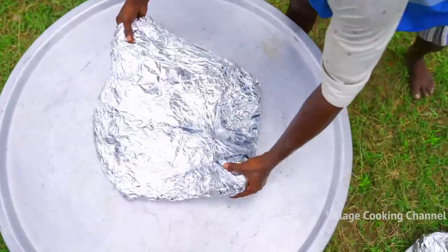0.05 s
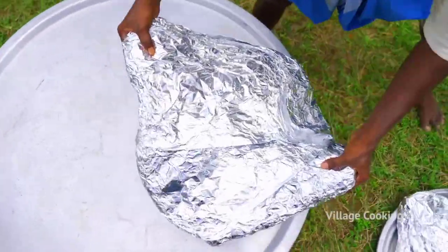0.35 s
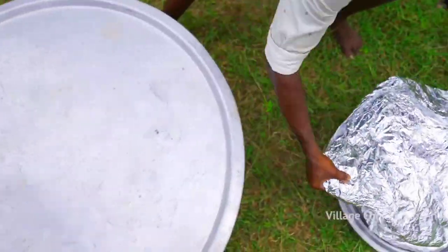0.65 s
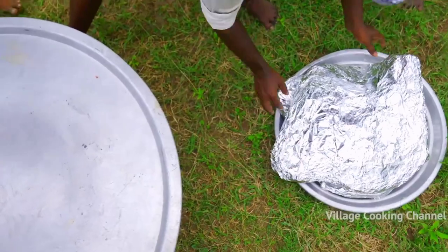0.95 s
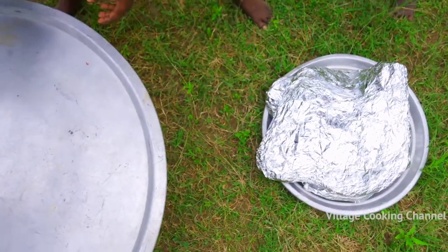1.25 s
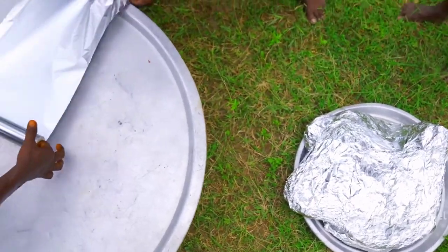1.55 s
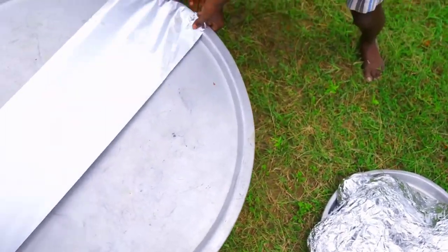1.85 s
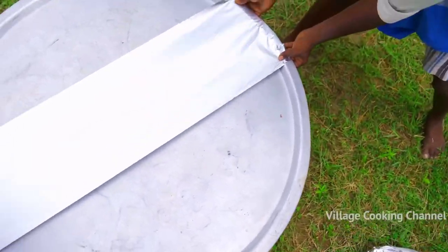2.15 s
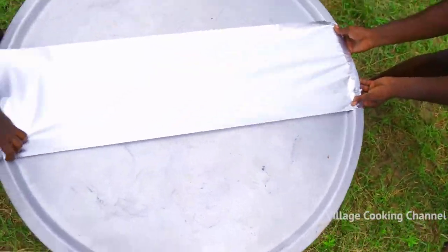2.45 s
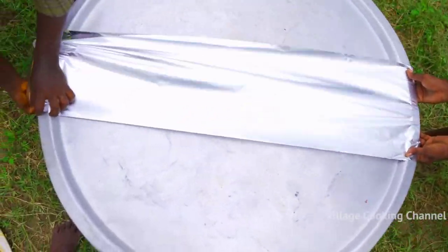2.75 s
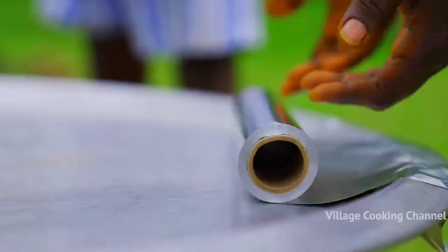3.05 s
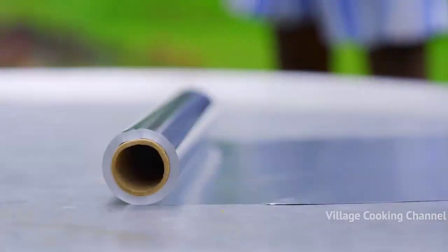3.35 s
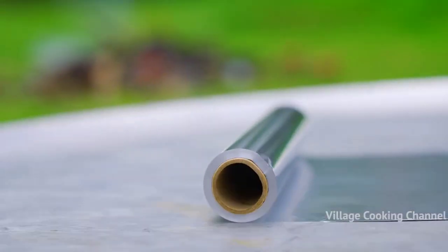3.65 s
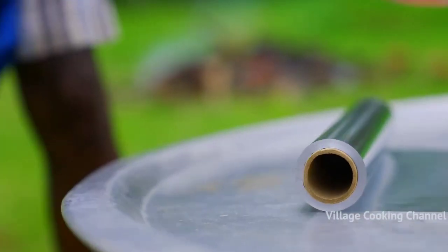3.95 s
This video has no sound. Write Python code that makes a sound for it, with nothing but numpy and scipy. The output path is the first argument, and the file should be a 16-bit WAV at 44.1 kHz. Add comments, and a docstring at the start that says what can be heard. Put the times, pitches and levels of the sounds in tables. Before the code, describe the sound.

Crinkling aluminium foil being handled and unrolled, ending with a rolling rumble on a metal tray.

```python
"""A sheet of aluminium foil is pulled crinkling off its roll, each crease buckling with a tiny click.
Before that, a foil-wrapped bundle is lifted off a big metal tray and set down on a smaller one,
while birds twitter in the open air. The fresh sheet is pressed onto the big tray; then the roll
trundles across it, close by, and its small impacts drive the tray's modes into a rumble."""
import sys
import numpy as np
from scipy import signal
from scipy.io import wavfile
from scipy.ndimage import uniform_filter1d

SR = 44100
rng = np.random.default_rng(int(sys.argv[2]) if len(sys.argv) > 2 else 0)


def store_wav(level_fs):
    """Save 16-bit WAV to argv[1]."""
    pcm = np.round(np.clip(np.atleast_2d(level_fs), -1, 1) * 32767)
    wavfile.write(sys.argv[1], SR, pcm.T.astype(np.int16))


N = 176400
T = np.arange(N) / SR


def amp(db):
    """Amplitude ratio of a level in decibels."""
    return 10 ** (np.asarray(db) / 20)


def unit(x):
    """Normalisation to rms 1."""
    return x / np.sqrt(np.mean(x ** 2) + 1e-20)


def bandpass(x, low_hz, high_hz, order=2):
    """Butterworth filtering to one band."""
    return signal.sosfilt(signal.butter(order, [low_hz, high_hz], "band", fs=SR, output="sos"), x)


def curves(rows):
    """Linear interpolation of each level column in time, with a fast fade outside the table."""
    times, *columns = np.transpose(rows)
    fade_db = 3000 * np.abs(T - np.clip(T, times[0], times[-1]))
    return [np.maximum(np.interp(T, times, db) - fade_db, -120) for db in columns]


def swells(rows):
    """A sum of Gaussian envelopes, one for each row."""
    return sum(amp(db) * np.exp(-((T - s) / sigma_s) ** 2 / 2) for s, db, sigma_s in rows)


def even(x, window_s):
    """Division by the running rms steadies the level and keeps the finer grain."""
    power = np.abs(uniform_filter1d(x * x, max(int(window_s * SR), 8)))
    return x / np.sqrt(power + 0.0012 * np.mean(x * x))


def clicks(per_s, spread_db, ring_s):
    """Envelope of a Poisson process: many small ticks and a few large, each decaying exponentially."""
    sizes = (rng.random(N) < per_s / SR) * amp(spread_db * np.minimum(rng.exponential(1, N), 5))
    energy = signal.lfilter([1], [1, -np.exp(-2 / (ring_s * SR))], sizes ** 2 + 1e-18)
    return np.sqrt(energy)


def colour(drive, spectrum):
    """Spectral shaping: an envelope modulates independent noise in half-octave bands; rms 1."""
    hz, db = np.transpose(spectrum)
    edges, out = np.geomspace(24, 17000, 20), 0
    for low, high in zip(edges, edges[1:]):
        if high > hz[0] and low < hz[-1]:
            band = bandpass(drive * rng.standard_normal(N) + 1e-18, low, high)
            out = out + band * amp(np.interp(np.log(low * high) / 2, np.log(hz), db))
    return unit(out)


def resonate(drive, modes, q):
    """Modal superposition: noise bursts drive damped resonators, the high ones dying sooner; rms 1."""
    out = 0
    for hz, db in modes:
        width_hz = 6 + hz / q
        r = np.exp(-np.pi * width_hz / SR)
        feedback = [1, -2 * r * np.cos(2 * np.pi * hz / SR), r * r]
        force = drive * rng.standard_normal(N) + 1e-18
        out = out + amp(db) * (1 - r * r) * signal.lfilter([1, 0, -1], feedback, force)
    return unit(bandpass(out, modes[0][0] / np.sqrt(2), modes[-1][0] * np.sqrt(2)))


def shimmer(x, t60_s=0.046):
    """Convolution with a short, uneven tail: dense reflections and close modes of the nearby metal."""
    age = T[:SR // 25]
    tail = rng.standard_normal(len(age)) * amp(-60 * age / t60_s)
    return x + amp(-13) * signal.fftconvolve(x, tail / np.linalg.norm(tail))[:N]


# spectrum of the outdoor background: f/Hz, density level/dB
AIR_SPECTRUM = [(30, -17), (80, 1), (250, 0), (2000, -25), (15000, -30)]
def air():
    """Stationary noise of the open air, strongest at low frequencies."""
    return amp(-46.5) * colour(1, AIR_SPECTRUM)


def chirps(notes, sigma_s=0.0025, fall_hz_per_s=65000):
    """Linear frequency sweeps: each note is a falling sine under a Gaussian envelope."""
    out = np.zeros(N)
    for s, hz in notes:
        near = np.abs(T - s) < 10 * sigma_s
        t = T[near] - s
        phase = 2 * np.pi * (hz - fall_hz_per_s * t / 2) * t
        out[near] += np.exp(-(t / sigma_s) ** 2 / 2) * np.sin(phase)
    return out


# notes of the near bird: t/s, f/Hz
BIRD_NOTES = [(.335, 6140), (0.403, 5840), (.605, 6600), (.629, 6600), (0.643, 5000), (.676, 4900),
              (.707, 4950)]
# twitter of far birds: t/s, level/dB
TWITTER_LEVEL = [(.1, -52), (.33, -45.5), (.46, -50), (1.05, -44.5)]
def birds(far_per_s=700, centre_hz=5940, width_hz=1350):
    """Single chirps stand out from a distant twitter, the incoherent sum of many more."""
    draws = rng.random((far_per_s * N // SR, 2))
    far_notes = [(when * N / SR, centre_hz + width_hz * (pitch - 0.5)) for when, pitch in draws]
    twitter = amp(curves(TWITTER_LEVEL)[0]) * unit(shimmer(chirps(far_notes)))
    return shimmer(amp(-37) * chirps(BIRD_NOTES) + twitter)


# decay of the tray's rim: t/s, level/dB
RIM_DECAY = [(2.76, -28), (3.06, -39.5)]
# modes of the rim: f/Hz, relative level/dB
RIM_PARTIALS = [(96.9, 0), (262, 3), (315, -0.5), (932, -7.5), (1195, -12)]
def rim():
    """Free vibration: after the roll is pressed down, the rim rings on, fading, then stops abruptly."""
    age = np.maximum(T - RIM_DECAY[0][0], 0)
    ring = sum(amp(db) * np.sin(2 * np.pi * (hz * age + rng.random())) for hz, db in RIM_PARTIALS)
    return amp(curves(RIM_DECAY)[0]) * unit(ring)


# knocks on the tray and flaps of the sheet: t/s, f/Hz, level/dB, T60/s
KNOCKS = [(0, 299, -22.5, 0.21), (0.821, 319, -29.5, 0.13), (1.659, 189, -20, 0.071),
          (2.079, 195, -13, 0.031), (2.479, 230, -15, 0.05), (2.622, 76.7, -18.5, 0.46),
          (2.622, 947, -20.5, 0.26), (2.741, 300, -4, 0.03)]
def thumps(rise_s=0.0013):
    """Each knock or flap is the impulse response of one damped oscillator."""
    out = 0
    for s, hz, db, t60 in KNOCKS:
        age = np.maximum(T - s, 0)
        envelope = amp(db - 60 * age / t60) * (1 - np.exp(-age / rise_s))
        out = out + envelope * np.sin(2 * np.pi * hz * age)
    return out


# low and high modes of the big tray's floor: f/Hz, relative level/dB
LOW_MODES = [(92, 4.5), (112, 6), (130, -3.5), (203, 1), (243, -0.5), (266, -2.5), (308, -1), (342, -4.5),
             (478, -11.5)]
HIGH_MODES = [(835, 8.5), (932, 6.5), (1088, 8), (1195, 6), (1285, 5.5), (1525, 2.5), (1680, 3.5),
              (1850, 4.5)]
def tray(db, modes, spectrum, per_s, ring_db, window_s):
    """Impact excitation of a plate: small bumps give a dead contact sound and ring its modes."""
    bumps = clicks(per_s, spread_db=1.94, ring_s=0.0041)
    contact = colour(bumps, spectrum)
    ring = amp(ring_db) * resonate(bumps, modes, q=50)
    return amp(db) * even(contact + ring, window_s)


def foil(levels, spectrum, spread_db):
    """Buckling of tiny creases: harder handling makes the clicks denser, louder and wider in band."""
    db, = curves(levels)
    effort_db = np.maximum(db - db.max(), -30)
    per_s = 200 + 2400 * amp(0.6 * effort_db)
    creases = clicks(per_s, spread_db, ring_s=0.0093)
    crinkle = even(shimmer(colour(creases, spectrum)), window_s=0.05)
    hiss = bandpass(crinkle, 1650, 9600, order=1)  # the band that remains in gentle handling
    return amp(db) * (hiss + amp(0.78 * effort_db) * (crinkle - hiss))


# the bundle's crumpling and its rubbing on the trays: t/s, level/dB
CRUMPLE_LEVEL = [(0, -44), (.045, -33.5), (.145, -28.5), (.228, -28), (.26, -45.5), (.44, -52.5), (.5, -40),
                 (.64, -48), (.76, -35.5), (.81, -26.5), (.816, -20.5), (.868, -22.5), (.92, -29.5),
                 (.997, -34), (1.003, -25), (1.025, -41.5), (1.06, -46)]
RUB_LEVEL = [(0, -38.5), (.1, -46), (.122, -23.5), (.175, -34.5), (.27, -43.5), (.8, -65), (.825, -20),
             (.92, -63)]
# their spectra: f/Hz, density level/dB
CRUMPLE_SPECTRUM = [(450, -2), (1000, 1.5), (2000, -1.5), (15000, -1.5)]
RUB_SPECTRUM = [(150, -1), (290, 9.5), (550, 3.5), (1000, 0.5), (3000, -32)]
def bundle():
    """The bundle's wrapping buckles, and its friction on the metal excites the upper modes."""
    rub_db, = curves(RUB_LEVEL)
    crumple = foil(CRUMPLE_LEVEL, CRUMPLE_SPECTRUM, spread_db=4.0)
    rub = tray(rub_db, LOW_MODES[5:] + HIGH_MODES, RUB_SPECTRUM, per_s=400, ring_db=-14.5, window_s=0.017)
    return crumple + rub


# the roll dragged on the tray: t/s, rumble level/dB, scrape level/dB
DRAG_LEVELS = [(2.375, -42, -53), (2.394, -24.5, -34), (2.44, -34.5, -48), (2.55, -33.5, -31.5),
               (2.614, -37, -43), (2.623, -25.5, -17.5), (2.685, -25.5, -23.5), (2.72, -33.5, -45),
               (2.81, -15, -24.5), (2.93, -30, -31), (3.06, -41, -39.5)]
# contact spectra of roll on tray: f/Hz, density level/dB
RUMBLE_SPECTRUM = [(35, -36), (85, -9.5), (320, -5), (700, -18.5)]
SCRAPE_SPECTRUM = [(300, -19), (500, 3.5), (1400, -16), (2500, -5.5), (8000, -14)]
def dragging():
    """Sliding friction drives the tray as the roll is dragged and pressed onto it."""
    rumble_db, scrape_db = curves(DRAG_LEVELS)
    rumble = tray(rumble_db, LOW_MODES, RUMBLE_SPECTRUM, per_s=350, ring_db=3, window_s=0.088)
    scrape = tray(scrape_db, HIGH_MODES, SCRAPE_SPECTRUM, per_s=1600, ring_db=-5, window_s=0.025)
    return rumble + scrape


# the roll running free: t/s, rumble level/dB, rattle level/dB
ROLL_LEVELS = [(3.095, -61.5, -75), (3.12, -25, -48), (3.235, -16.5, -22.5), (3.35, -14, -24),
               (3.41, -15.5, -18), (3.46, -16.5, -26.5), (3.535, -12.5, -22), (3.72, -21.5, -35.5),
               (3.89, -20, -33), (4, -28.5, -44)]
# swishes of foil peeling off the turning roll: t/s, level/dB, Gaussian sigma/s
SWISHES = [(3.24, -22, 0.021), (3.305, -27, 0.021), (3.405, -24.5, 0.031), (3.522, -25, 0.03),
           (3.692, -33, 0.02), (3.81, -32, 0.02), (3.887, -34.5, .016)]
# spectra of rattle and swish: f/Hz, density level/dB
RATTLE_SPECTRUM = [(350, -4), (550, 6), (1700, -9), (2500, -6.5), (9000, -24.5)]
SWISH_SPECTRUM = [(1500, 0.5), (5000, 0), (7800, -5.5), (8800, -12), (15000, -19)]
def rolling(sizzle_hz=7130):
    """Rolling contact drums on the tray while foil peels off in swishes with a sizzling resonance."""
    rumble_db, rattle_db = curves(ROLL_LEVELS)
    ticks = clicks(per_s=1500, spread_db=3.2, ring_s=0.003)
    peel = even(shimmer(colour(ticks, SWISH_SPECTRUM)), window_s=0.041)
    sizzle = amp(-8.5) * resonate(ticks, [(sizzle_hz, 0)], q=27)
    rumble = tray(rumble_db, LOW_MODES, RUMBLE_SPECTRUM, per_s=280, ring_db=6.5, window_s=0.1)
    rattle = tray(rattle_db, HIGH_MODES, RATTLE_SPECTRUM, per_s=520, ring_db=1.5, window_s=0.023)
    return rumble + rattle + swells(SWISHES) * (peel + sizzle)


# single large creases: t/s, onset level/dB
CREASE_SNAPS = [(0.216, -22), (.319, -38), (.525, -29.5), (.585, -33), (0.77, -28), (1.002, -22),
                (1.069, -15), (1.649, -18), (1.894, -20), (2.94, -19)]
# their spectrum: f/Hz, density level/dB
SNAP_SPECTRUM = [(1500, -16), (8000, 3), (15000, 2)]
def snaps(t60_s=0.026):
    """Snap-through buckling: a large crease gives way with a bright, exponentially dying tick."""
    envelope = sum(amp(db - 60 * np.maximum(T - s, 0) / t60_s) * (T >= s) for s, db in CREASE_SNAPS)
    return envelope * colour(1, SNAP_SPECTRUM)


def glide(x, centre_hz, block=128):
    """A broad resonance that follows a moving centre frequency."""
    out, state = np.zeros(N), np.zeros(2)
    for i in range(0, N, block):
        b, a = signal.iirpeak(centre_hz[i], Q=2, fs=SR)
        out[i:i + block], state = signal.lfilter(b, a, x[i:i + block], zi=state)
    return out


# crinkling of the tugged sheet: t/s, relative level/dB
TUG_LEVEL = [(1.06, -35), (1.072, -18.5), (1.15, -21.5), (1.172, -15), (1.204, -24), (1.244, -17),
             (1.256, -25), (1.292, -24.5), (1.31, -15), (1.36, -22.5), (1.422, -17), (1.44, -26.5),
             (1.494, -20.5), (1.58, -26.5), (1.612, -21.5), (1.643, -26), (1.651, -16.5), (1.73, -24.5),
             (1.835, -22), (1.89, -21.5), (1.972, -29), (1.992, -21.5), (2.054, -28), (2.088, -20),
             (2.145, -19), (2.19, -23.5), (2.32, -29.5), (2.375, -26), (2.398, -19.5), (2.5, -22),
             (2.552, -17.5), (2.602, -24), (2.65, -19), (2.72, -15), (2.755, -19.5), (2.82, -19.5),
             (3.078, -46), (3.09, -31.5), (3.15, -44)]
# its spectrum: f/Hz, density level/dB
SHEET_SPECTRUM = [(200, -8.5), (1500, -7.5), (6500, -2.5), (15000, 0.5)]
# resonance of the lengthening sheet: t/s, f/Hz
SHEET_RESONANCE = [(1.6, 5200), (2.05, 3180)]
# crackles of the flexing sheet: t/s, level/dB, Gaussian sigma/s
FLEX_SWELLS = [(1.135, -30.5, 0.037), (1.315, -40, 0.017), (1.422, -29.5, 0.0054), (1.69, -37.5, 0.053),
               (1.83, -35, 0.08)]
def sheet():
    """Buckling creases hiss through a resonance that sinks as the sheet grows; flexing rings its modes."""
    hiss = foil(TUG_LEVEL, SHEET_SPECTRUM, spread_db=3.8)
    resonance = glide(hiss, np.interp(T, *np.transpose(SHEET_RESONANCE)))
    modes = [(hz, 0) for hz in np.geomspace(500, 2830, 24)]
    pops = clicks(per_s=120, spread_db=3, ring_s=0.001)
    crackles = swells(FLEX_SWELLS) * even(resonate(pops, modes, q=17), window_s=0.017)
    return 1.098 * hiss + 0.41 * resonance + crackles


def scene():
    """Linear superposition of all sources, the same in both channels."""
    mono = air() + bundle() + sheet() + dragging() + rim() + rolling() + snaps() + thumps() + birds()
    return np.array([mono, mono])


def record(dry, cutoff_hz=15900):
    """Soft saturation rounds the peaks, and a steep low-pass cuts the top."""
    rounded = 1.09 * np.tanh(dry / 1.074)
    return signal.sosfilt(signal.ellip(12, 0.1, 80, cutoff_hz, fs=SR, output="sos"), rounded)


dry = scene()
out = record(dry)
store_wav(out)
```